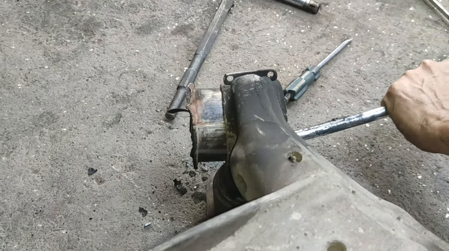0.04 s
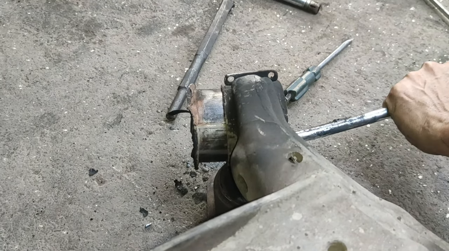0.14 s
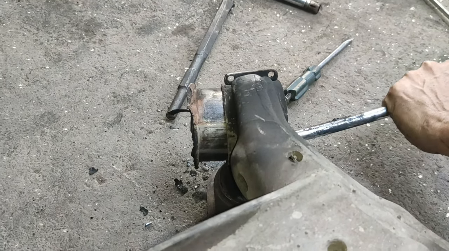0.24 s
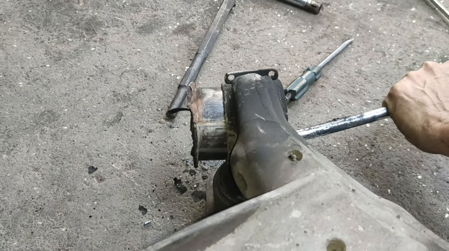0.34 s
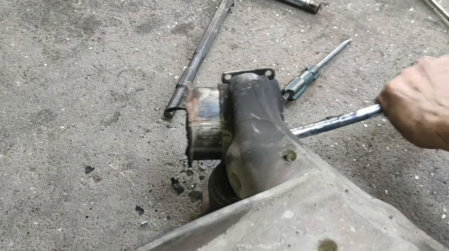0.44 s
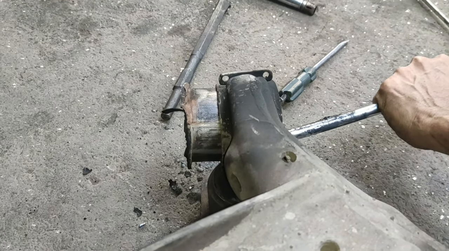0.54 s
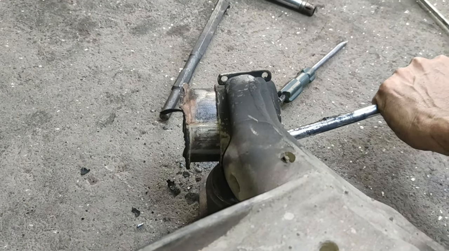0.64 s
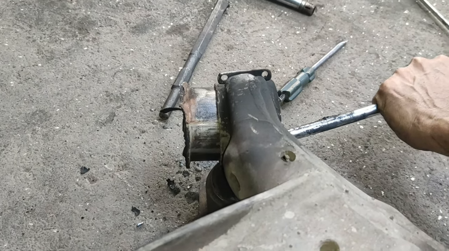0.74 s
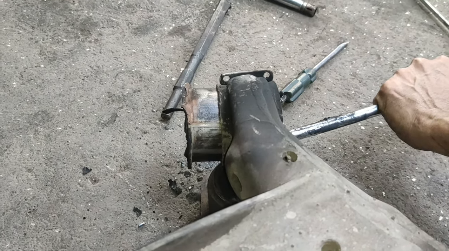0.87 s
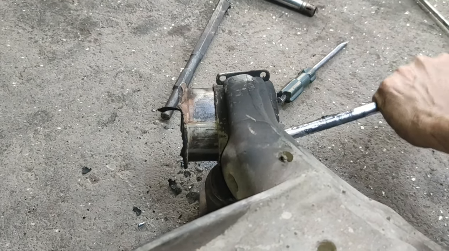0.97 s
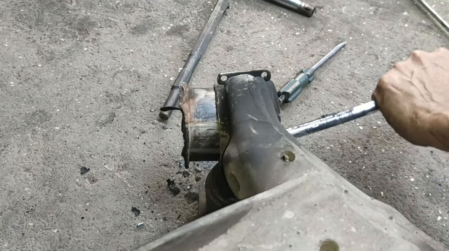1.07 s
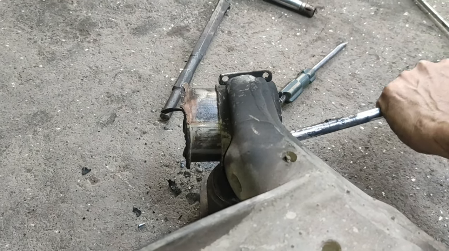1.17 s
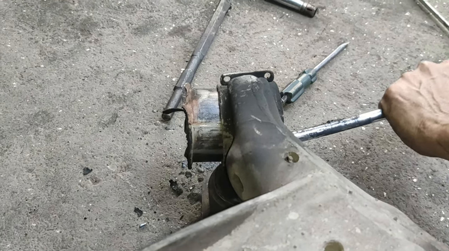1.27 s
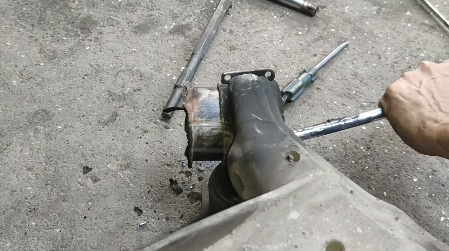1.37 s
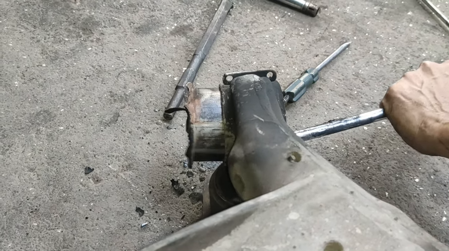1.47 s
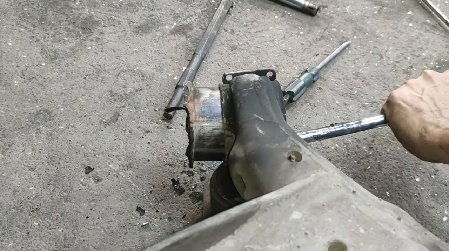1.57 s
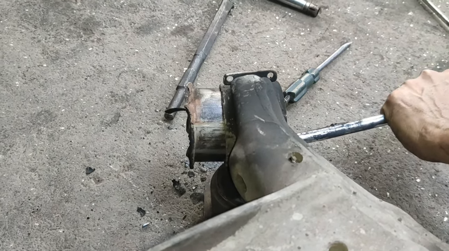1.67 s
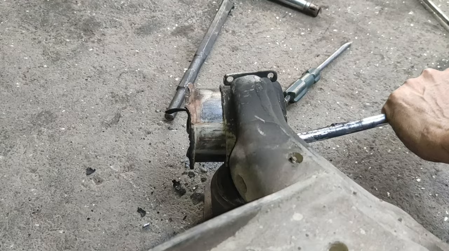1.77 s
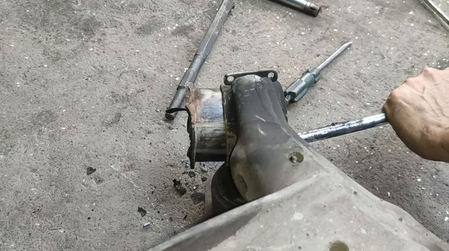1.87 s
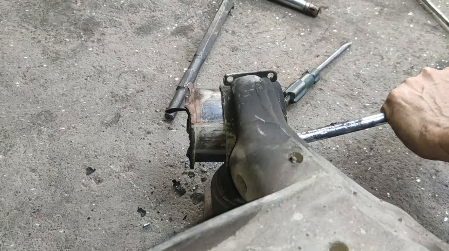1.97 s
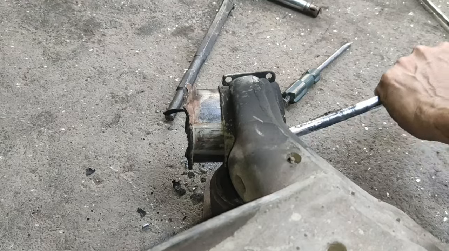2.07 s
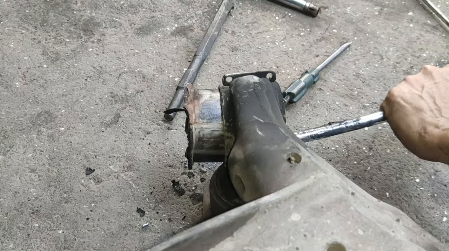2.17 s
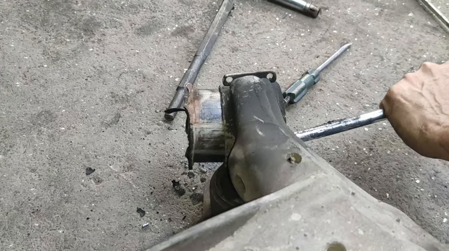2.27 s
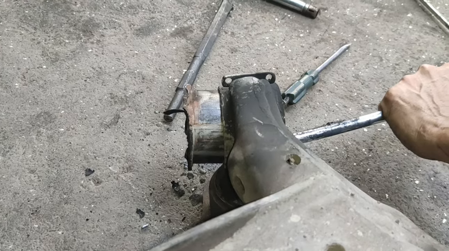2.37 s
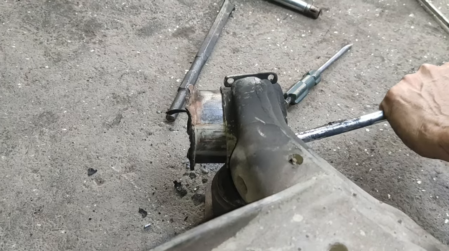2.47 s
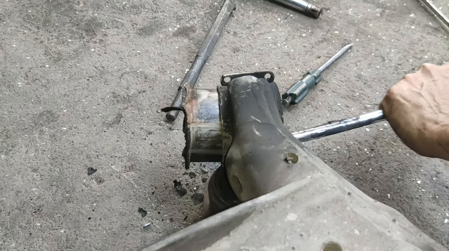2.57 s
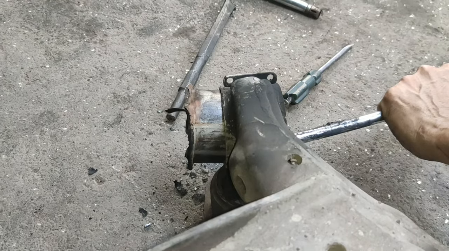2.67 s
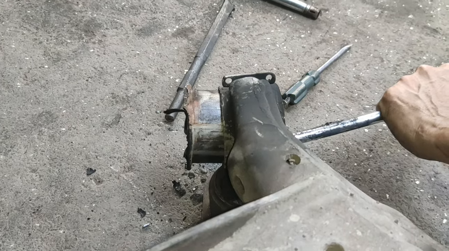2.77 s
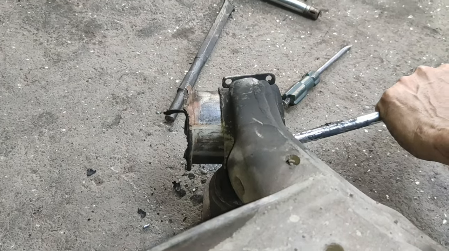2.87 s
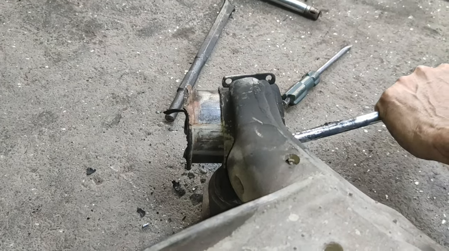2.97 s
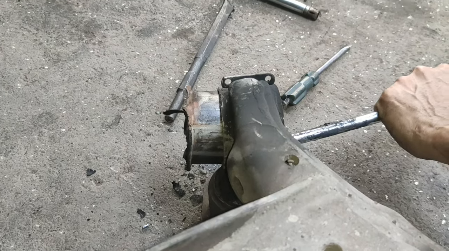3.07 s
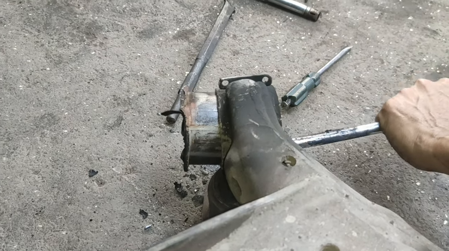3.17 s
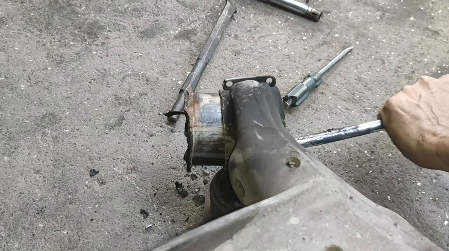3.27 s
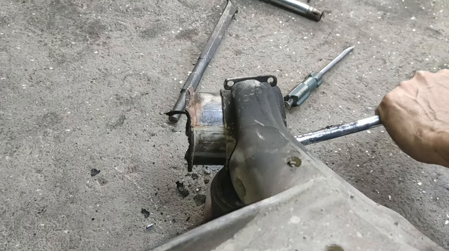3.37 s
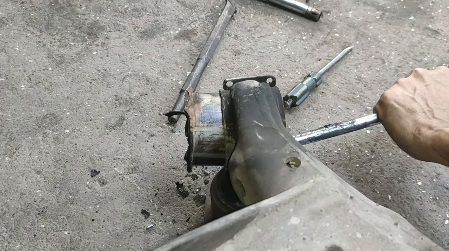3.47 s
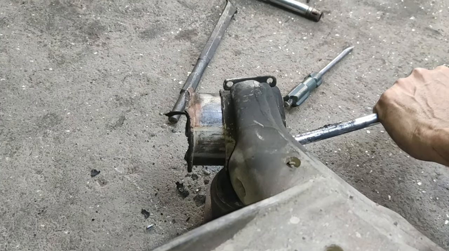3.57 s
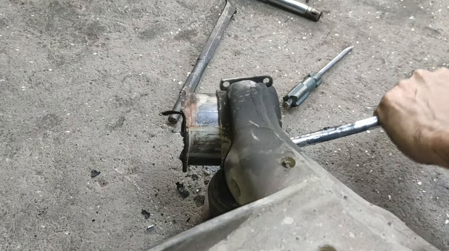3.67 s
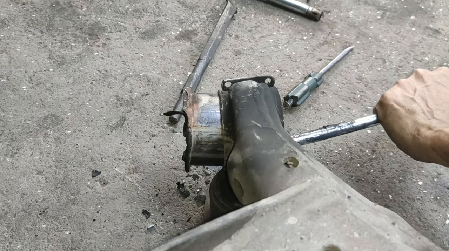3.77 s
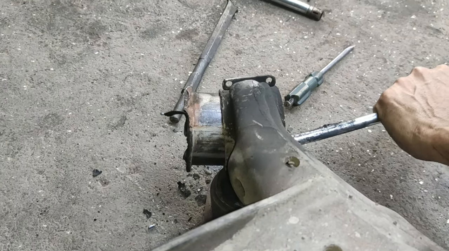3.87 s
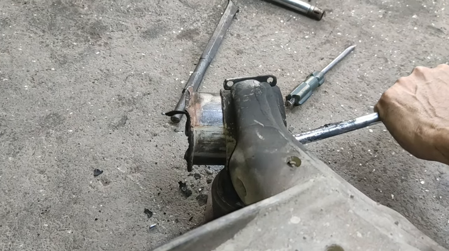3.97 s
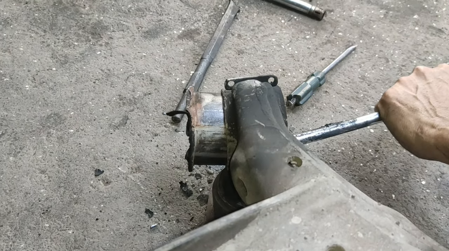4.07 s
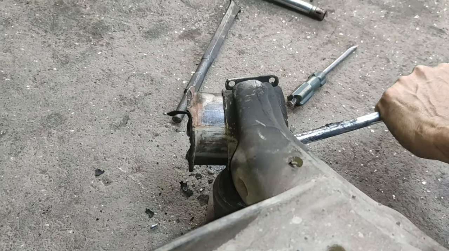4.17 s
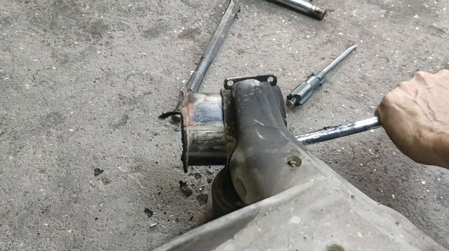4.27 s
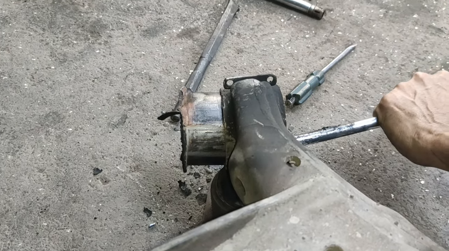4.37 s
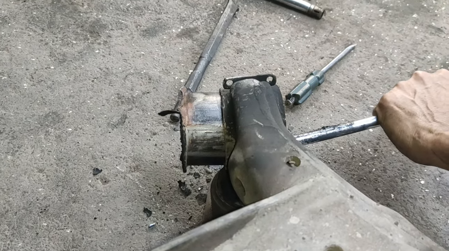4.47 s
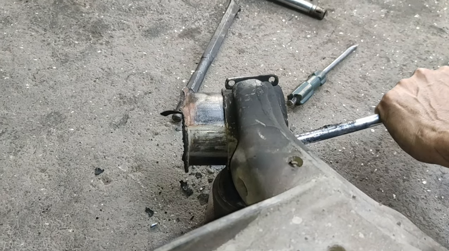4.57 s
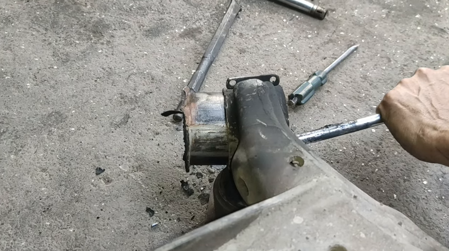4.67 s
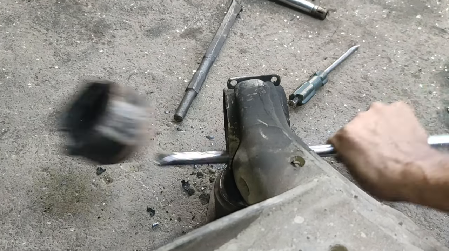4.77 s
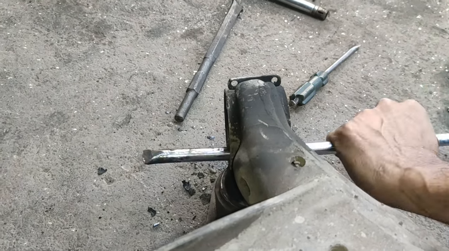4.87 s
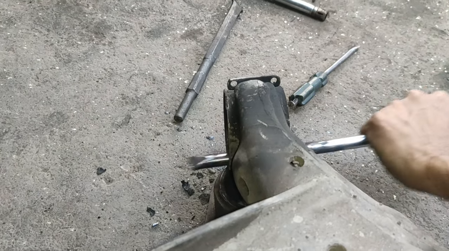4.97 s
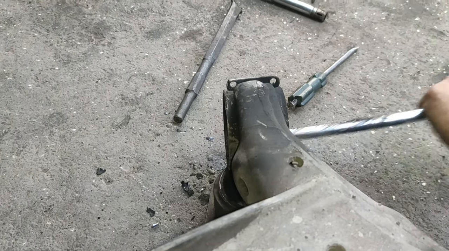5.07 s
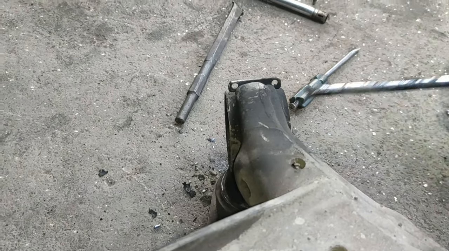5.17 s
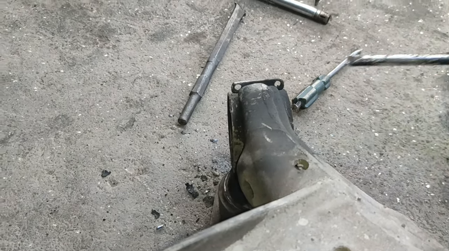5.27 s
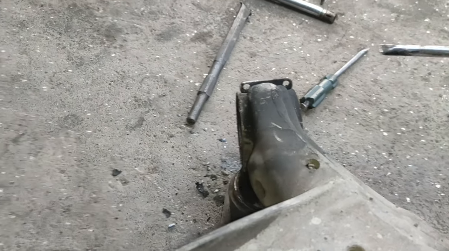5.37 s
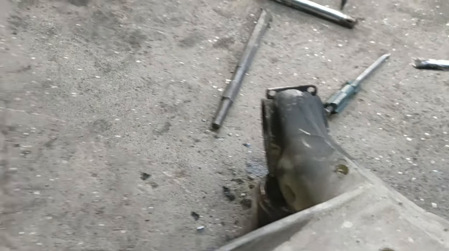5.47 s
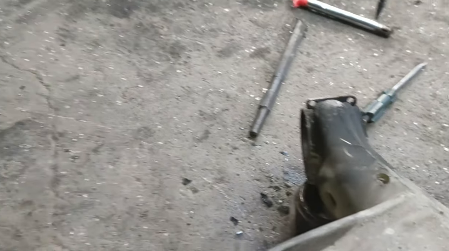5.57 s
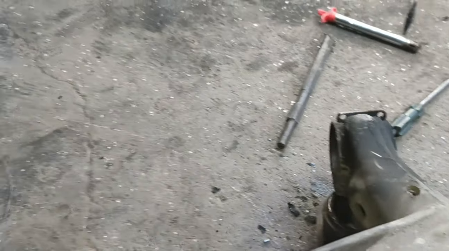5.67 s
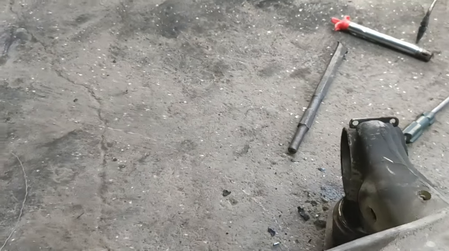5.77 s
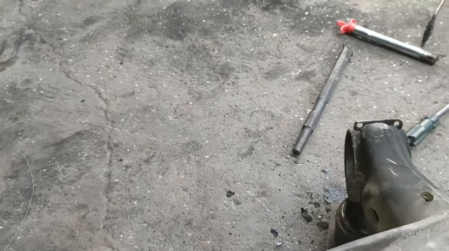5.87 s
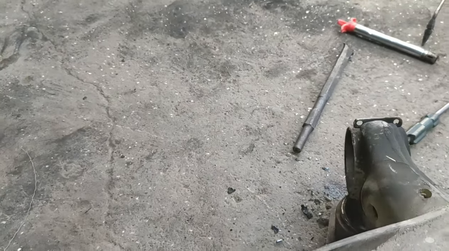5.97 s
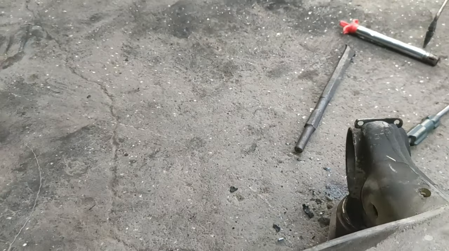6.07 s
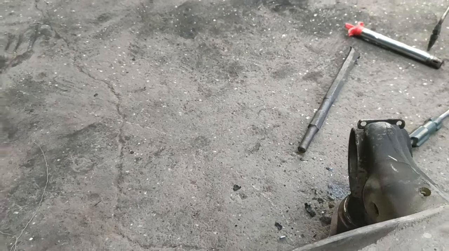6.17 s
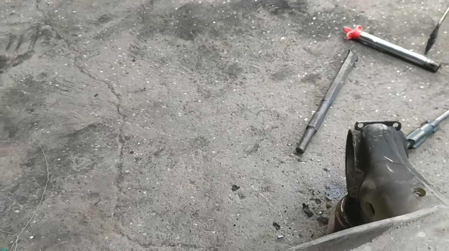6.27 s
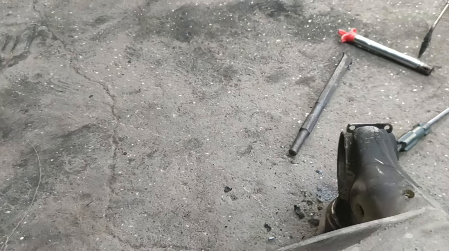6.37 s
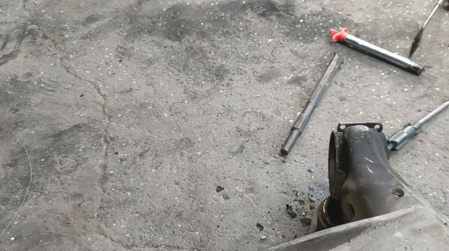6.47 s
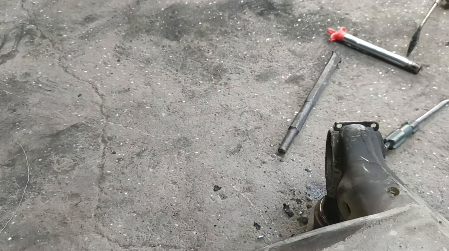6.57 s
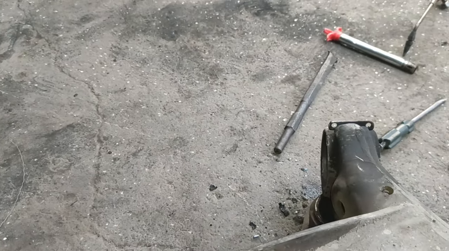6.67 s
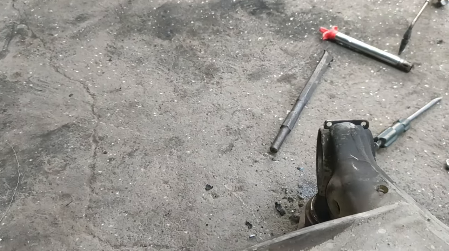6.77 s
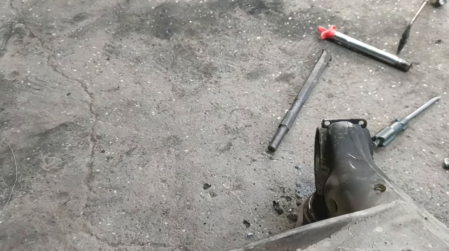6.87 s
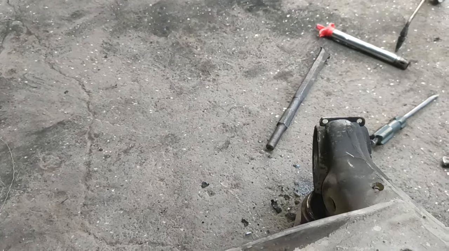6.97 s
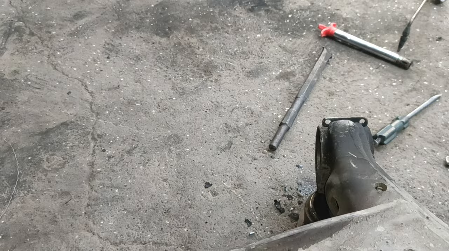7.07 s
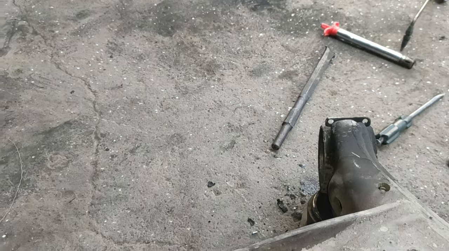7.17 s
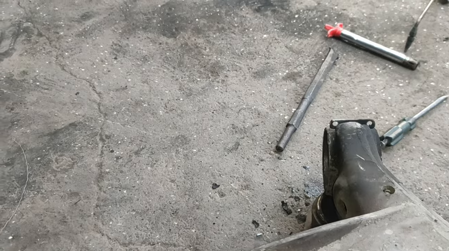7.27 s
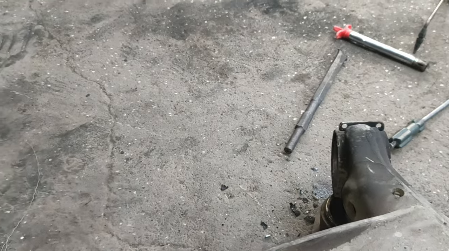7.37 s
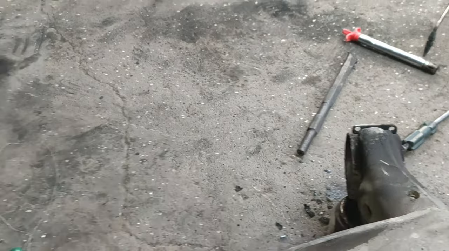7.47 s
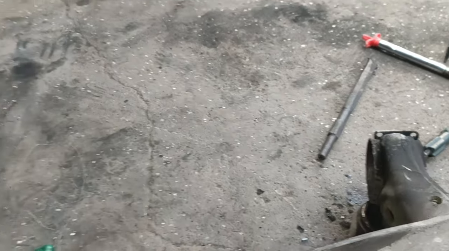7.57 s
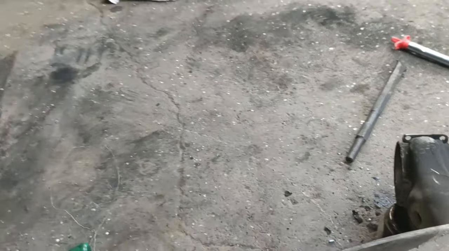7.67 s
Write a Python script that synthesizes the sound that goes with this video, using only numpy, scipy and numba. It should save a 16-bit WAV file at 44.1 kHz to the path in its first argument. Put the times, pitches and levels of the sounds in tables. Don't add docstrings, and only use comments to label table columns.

```python
import sys
import numpy as np
from scipy import signal
from scipy.fft import rfft, irfft
from scipy.io import wavfile
from scipy.ndimage import uniform_filter1d
from numba import njit

SR = 44100
rng = np.random.default_rng(int(sys.argv[2]) if len(sys.argv) > 2 else 0)


def volts_from_decibels(level):
    exponent = np.asarray(level, float) / 20
    return 10 ** exponent


def put_to_file(sound):
    columns = np.atleast_2d(sound).T
    safe = np.clip(columns, -1, 1)
    whole_steps = np.round(safe * 32767)
    wavfile.write(sys.argv[1], SR, whole_steps.astype(np.int16))


N = 340872
TIME = np.arange(N) / SR
PORT_LAG = 15


def on_log(hz, table):
    table_hz, values = np.transpose(table)
    return np.interp(np.log(np.maximum(hz, 1)), np.log(table_hz), values)


def colour(x, db_of):
    size = x.shape[-1]
    hz = np.minimum(np.arange(size // 2 + 1) * SR / size, 13000)
    y = irfft(rfft(x) * volts_from_decibels(db_of(hz)), size)
    return y / np.sqrt(np.mean(y ** 2))


def fade(t, t60):
    return np.exp(-np.log(1000) * t / t60)


def add(out, x, s):
    i = int(s * SR)
    out[i:i + len(x)] += x[:N - i]


def ring(hz, modes, hits, bands_hz, scatter_db, keep):
    hz, hits = np.array(hz), np.array(hits)
    db, t60, pan_db = np.transpose(modes)
    band = np.argmin(abs(np.log(hz[:, None] / np.array(bands_hz))), axis=1)
    chance = rng.standard_normal((len(hits), 2, len(hz)))
    pole = (2j * np.pi * hz - np.log(1000) / t60) / SR
    beams = volts_from_decibels([pan_db / 2, -pan_db / 2])
    starts = (hits[:, 0] * SR).astype(int)
    ends = [*starts[1:], min(starts[-1] + SR, N)]
    out, state = np.zeros((2, N)), 0
    for k, (i, j) in enumerate(zip(starts, ends)):
        kick_db = hits[k, 1 + band] + db + scatter_db * chance[k, 0]
        state = keep * state + volts_from_decibels(kick_db) * np.exp(.4j * chance[k, 1])
        out[:, i:j] = (beams * state @ np.exp(pole[:, None] * np.arange(j - i))).imag
        state = state * np.exp(pole * (j - i))
    return out


# frequency in Hz, level in dB per Hz.
AIR_SPECTRUM = [(8.8, -31), (15, -6.5), (37, 0), (75, -5), (106, -4.5), (137, -13.5), (277, -15.5),
                (302, -20.5), (416, -27), (644, -25), (1540, -33), (5250, -36), (9970, -41.5), (15900, -50)]


def air():
    mid, side = colour(rng.standard_normal((2, N)), lambda hz: on_log(hz, AIR_SPECTRUM))
    side = side - .5 * uniform_filter1d(side, size=150)
    side = side + 0.25 * (mid - uniform_filter1d(mid, size=300))
    steps = np.repeat(rng.standard_normal(N // 4000 + 1), 4000)
    swell = uniform_filter1d(steps, size=4000)[:N]
    return volts_from_decibels(-35 + 0.14 * swell) * (mid + side * np.array([[1], [-1]]))


# frequency in Hz, time to fall 60 dB in seconds.
ROOM_T60 = [(60, 1.5), (200, 0.91), (700, 1.126), (2000, 0.97), (5000, 0.9), (9000, 0.75), (15000, 0.36)]
# frequency in Hz, shared part from 0 to 1.
ALIKE = [(60, 0.82), (150, 1), (350, 0.83), (700, 0.45), (1400, 0.55), (3000, 0), (12000, 0)]


def echo():
    t = TIME[:2 ** 16]
    f = np.arange(len(t) // 2 + 1) * SR / len(t)
    shared, left, right = rfft(rng.standard_normal((3, len(t))))
    lag_s = PORT_LAG / SR * f ** 2 / (f ** 2 + 500 ** 2)
    lagged = shared * np.exp(-2j * np.pi * f * lag_s)
    alike = np.clip(on_log(f, ALIKE), 0, 1)
    pair = np.sqrt(alike) * np.array([lagged, shared]) + np.sqrt(1 - alike) * np.array([left, right])
    out = 0
    for hz in 20 * 2 ** np.arange(0, 10, 1 / 3):
        mask = np.clip(1 - 3 * abs(np.log2(np.maximum(f, 1) / hz)), 0, 1)
        build_up = 1 - np.exp(-t / (.002 + 8 / hz))
        out = out + irfft(pair * mask) * fade(t, on_log(hz, ROOM_T60)) * build_up
    return out / np.sqrt(np.sum(out ** 2) / 2)


def heard(x, pan_db, wet_db, room, lag):
    left, right = np.broadcast_to(x, (2, N))
    wet = signal.fftconvolve((left + right)[None] / 2, room, axes=1)[:, :N]
    direct = np.array([np.roll(left, lag), right])
    return volts_from_decibels([[pan_db / 2], [-pan_db / 2]]) * (direct + volts_from_decibels(wet_db) * wet)


# start in seconds, peak level in dB, centre in Hz, time to fall 60 dB in seconds, crack in
# dB.
KNOCKS = [(2.957, -22, 10000, .06, -4), (3.045, -24, 800, .04, -20), (3.166, -32, 6000, .02, -6),
          (4.771, -3, 2500, .03, -3), (4.960, -5, 300, .03, -2), (5.102, -9, 600, .03, 0),
          (5.195, -24, 3000, .03, -3), (5.260, -17, 2500, .04, 0), (5.420, -31, 9000, .05, -8),
          (5.766, -12, 450, .06, -10), (5.843, -9, 400, .08, -8), (5.900, -24, 8000, .03, -3),
          (5.974, -14, 220, .06, -24), (6.014, -13, 350, .1, -8), (6.040, -18, 350, .1, -12),
          (6.174, -15, 1200, .04, -8), (6.205, -24, 3200, .05, -14), (6.228, -30, 1500, .04, -16),
          (6.262, -31, 1400, .04, -16), (6.315, -33, 1500, .04, -16)]


def knocks():
    out, t = np.zeros(N), TIME[:8192]
    for s, db, centre_hz, t60, crack_db in KNOCKS:
        noise = rng.standard_normal((2, len(t)))
        body = colour(noise[0], lambda hz: -9 * abs(np.log2(np.maximum(hz, 1) / centre_hz)))
        click = colour(noise[1], lambda hz: -13 * np.log2(1 + hz / (4 * centre_hz)))
        thud = body * fade(t, t60) + volts_from_decibels(crack_db) * click * fade(t, .025)
        add(out, volts_from_decibels(db - 3) * thud, s)
    return out


# frequency in Hz, split in Hz, level in dB,
# time to fall 60 dB in seconds, lower twin's level in dB, left minus right in dB.
DRIFT_PAIRS = [(2790, 3, 0, .3, -12, 2), (4596, 7, 3, .4, -13, -8), (6804, 8, -1, .5, -7, 11),
               (9235, 25, 0, .36, -4, 11), (11990, 40, -7, .35, -7, -6), (15205, 12, -8, .35, -6, 14)]
# start in seconds, level in dB, hardness in dB per octave, place along the bar from 0 to 1.
CLINKS = [
    (5.752, -31, 2.2, .03),
    (5.887, -27.5, 16, .04),
    (5.900, -30.5, 18.5, .15),
    (6.175, -20, -7, .1),
    (6.201, -25, -1, .01),
]
# let go in seconds, free for in seconds, damping in dB per second.
GRIP = [
    (5.752, 0.058, 40),
    (5.884, 0.017, 223),
    (6.174, 0.17, 80),
]


def drift():
    hz, pairs = [], []
    for pair_hz, split, db, t60, twin_db, pan_db in DRIFT_PAIRS:
        hz += [pair_hz, pair_hz - split]
        pairs += [(db, t60, pan_db), (db + twin_db, t60, pan_db)]
    bands_hz = np.transpose(DRIFT_PAIRS)[0]
    waves = (np.arange(3, 9) + .5) * np.pi
    hits = []
    for s, db, hard, place in CLINKS:
        phase = waves * abs(place)
        shape = abs(np.cos(phase) - np.sin(phase) + np.exp(-phase)) + .03
        hits.append((s, *(db + hard * np.log2(bands_hz / bands_hz[2]) + 20 * np.log10(shape))))
    grips = np.array(GRIP)
    latest = np.maximum(np.searchsorted(grips[:, 0], TIME) - 1, 0)
    start, free, rate = grips[latest].T
    held = volts_from_decibels(-rate * np.maximum(TIME - start - free, 0))
    return held * ring(hz, pairs, hits, bands_hz, scatter_db=0, keep=.25)


# start in seconds, level in dB,
# flat on its side (positive) or on its edge (negative), spot on the rim.
BOUNCES = [
    (4.775, -15.5, -1.6, 0.055),
    (4.960, -24.5, -1.9, -0.62),
    (5.102, -28, 1.24, .66),
    (5.195, -28.5, 0.78, -0.61),
    (5.260, -15, -0.4, 0.82),
    (5.340, -34, 1.6, -.94),
    (5.420, -35, 0.16, 0.64),
]
SLEEVE_BANDS_HZ = [3300, 3850, 5000, 6300, 7000]
# dB for one unit of flatness, then dB for one unit of rim spot.
FLAT_DB = [8, -2.5, 1.7, -1.2, -5]
SPOT_DB = [-0.5, -5, 5, -6.5, 4]
SLEEVE_HZ = [1663, 3305, 3317, 3601, 3768, 4135, 4906, 4995, 5007, 6250, 6437, 6623, 6678, 6883, 7257, 7755,
             8142, 8366, 9715, 11035, 12790, 13430, 14380, 14680]
# level in dB, time to fall 60 dB in seconds, left minus right in dB.
SLEEVE = [(-17, .8, 8.5), (-5.5, 0.65, -7), (-4.5, 1, 2), (-3, 0.49, 7), (1, 0.22, 9), (1, 0.33, 10.5),
          (-26, .3, -2), (-3.5, 0.56, -6), (-1.5, 0.4, 20.5), (-19, .8, 6), (4.5, 0.11, 22), (-9, 0.31, -2),
          (-1, 0.35, 14.5), (-12, 0.19, 13), (-15, 0.31, 8), (-4, 0.24, 8), (4.5, 0.12, 9), (-14, 0.3, 12),
          (-4.5, 0.081, 16), (-13, 0.14, 6), (-17, 0.34, 9), (-22, .55, 4), (-24, .4, 6), (-31, .5, 6)]
# time in seconds, hum in dB, turn of the oval in radians, lean to the upper mode in dB.
ROLL = [(4.85, -24, .2, -3), (4.97, -15, 0.18, -13), (5.09, -17, 0.37, -7), (5.17, -12, 0.33, -22),
        (5.3, -23, .4, -2.5), (5.40, -16, 1.7, -10.5), (5.46, -16.5, .2, -0.5), (5.54, -38.5, 0.51, 6.5),
        (5.72, -47, 0.43, -1)]
# the oval's two axes and an upper mode, in Hz.
ROLL_HZ = [1254, 1319, 1863]


def sleeve():
    roll_s, *controls = np.transpose(ROLL)
    db, turn, lean_db = (np.interp(TIME, roll_s, c) for c in controls)
    shares = np.sin(turn), np.cos(turn), volts_from_decibels(lean_db)
    rolling = volts_from_decibels(db) * (TIME > roll_s[0]) * (TIME < roll_s[-1])
    hum = rolling * sum(share * np.sin(2 * np.pi * hz * TIME) for hz, share in zip(ROLL_HZ, shares))
    rest = np.where(TIME > 5.5, fade(TIME - 5.5, .45), 1)
    hits = []
    for s, hit_db, flat, spot in BOUNCES:
        hits.append((s, *(hit_db + flat * np.array(FLAT_DB) + spot * np.array(SPOT_DB))))
    return hum + rest * ring(SLEEVE_HZ, SLEEVE, hits, SLEEVE_BANDS_HZ, scatter_db=1.5, keep=.6)


# start in seconds, strength in dB, treble in dB, rattle in seconds.
BLOWS = [
    (0.0, -6.5, -1, 0.0037),
    (0.484, -4, 0, 0.013),
    (0.995, -3, 1, 0.02),
    (1.529, -3.5, -1.5, 0.028),
    (2.059, -6, -2.5, 0.0076),
    (2.6, -3.5, .5, 0.015),
    (3.177, -3, -2, 0.043),
    (3.708, -4, -3, 0.015),
    (4.249, -3, .5, 0.0058),
    (4.774, -5, 6, 0.012),
]
# first in Hz, its dB, second in Hz, its dB.
FAVOURED = [(1172, -19, 2208, -24.5), (1172, -19, 4000, -18), (1170, -21, 5800, -22),
            (1170, -20, 4550, -10), (1102, -27, 3390, -12), (1102, -29, 4500, -13), (1170, -19, 2250, -16),
            (1172, -20, 6500, -13), (1188, -22, 6150, -11), (3768, -19, 6437, -13)]
# frequency in Hz, time to fall 60 dB in seconds.
FAVOURED_T60 = [(1102, 1.5), (1170, .55), (2200, .18), (4500, .2), (6400, .27)]
# Low, middle and treble of a blow, in Hz.
BLOW_BANDS_HZ = [700, 3500, 11000]
# frequency in Hz, level in dB per Hz.
CRACK = [(35, -25), (60, 2.5), (113, -13.5), (172, -4), (330, -12.5), (625, -4), (965, -7.5), (1190, -6),
         (1580, -8.5), (2180, -7.5), (6250, -6.5), (13800, -15), (15900, -34.5)]
ARM_HZ = [176, 204, 413, 527, 624, 686, 910, 1023, 1102, 1170, 1227, 2208, 2276, 2790, 3228, 3460, 4463,
          5001, 5900, 6470, 6650]
# level in dB, time to fall 60 dB in seconds.
ARM = [(-10, 2.5), (-7.5, 1.5), (-11.5, 0.88), (-6, 0.57), (-6, 0.79), (-16.5, 2.3), (1, 0.58), (0.5, 0.58),
       (-24, 1.9), (3, 0.24), (4.5, 0.34), (7.5, 0.63), (-2, 1.1), (-36, 0.2), (-1, 0.82), (8, 0.28),
       (-6, 2.1), (9, 0.24), (-41.5, 0.64), (6, 0.35), (-7, 0.72)]


def hammer():
    out, t, ring_t, kicks = np.zeros(N), TIME[:8192], TIME[:SR // 2], []
    for (s, db, high, rattle), favoured in zip(BLOWS, FAVOURED):
        low = -7 * (s / BLOWS[-1][0]) ** 4.3
        tilt = list(zip(BLOW_BANDS_HZ, (low, 0, high)))
        kicks.append((s, db + low - 15.5, db - 21, db + high - 19.0))
        envelope = np.exp(-t / max(rattle, .003)) + 3.6 * np.exp(-t / 0.0034)
        burst = rfft(rng.standard_normal(len(t)) * envelope)
        even = irfft(burst / abs(burst) ** 0.74)
        chatter = colour(even, lambda hz: on_log(hz, CRACK) + on_log(hz, tilt))
        add(out, volts_from_decibels(db - 6.5) * chatter * fade(t, 0.15), s)
        for hz, mode_db in np.reshape(favoured, (2, 2)):
            flutter = uniform_filter1d(rng.standard_normal(len(ring_t)), size=120) * 11
            swing = np.clip(hz / 1200 - 1, 0, 1) * flutter + np.clip(2 - hz / 1200, 0, 1)
            tone = np.sin(2 * np.pi * hz * ring_t) * fade(ring_t, on_log(hz, FAVOURED_T60))
            add(out, swing * volts_from_decibels(mode_db) * tone, s)
    modes = [(db, .4 * t60, 0) for db, t60 in ARM]
    return out + ring(ARM_HZ, modes, kicks, BLOW_BANDS_HZ, scatter_db=4, keep=.3)


def scene():
    room = echo()
    return (heard(hammer(), 1, 4.7, room, lag=PORT_LAG)
            + heard(sleeve(), 0.11, -14, room, lag=PORT_LAG)
            + heard(drift(), 0.1, -12.5, room, lag=1)
            + heard(knocks(), 0.96, -5.5, room, lag=4)
            + air())


@njit
def follow(x, attack, release):
    e, y = 0., np.empty(len(x))
    for i in range(len(x)):
        e += (x[i] - e) * (attack if x[i] > e else release)
        y[i] = e
    return y


def top_cut(x):
    return signal.sosfilt(signal.butter(12, 16040, fs=SR, output="sos"), x)


def record(dry):
    level = np.roll(follow(abs(dry).max(axis=0), .004, .0002), 1400)
    held = dry * np.minimum(1, 0.77 / (level + 1e-9)) ** 0.35
    lopsided = signal.lfilter([1, -1], [1, -.997], np.clip(held, -1.5, 1.5) ** 2)
    mix = np.clip(held + 0.083 * lopsided, -1, 1)
    return top_cut(mix)


dry = scene()
out = record(dry)
put_to_file(out)
```